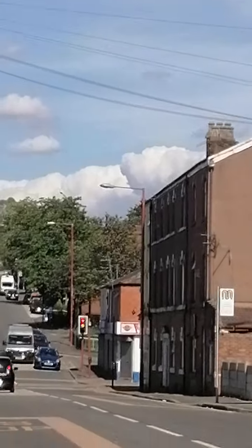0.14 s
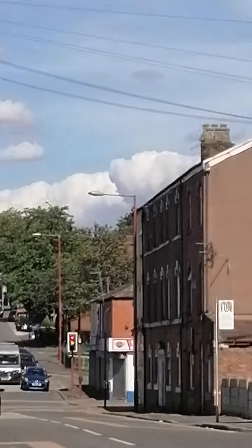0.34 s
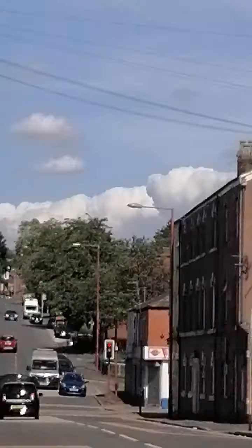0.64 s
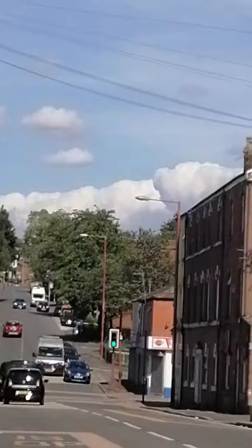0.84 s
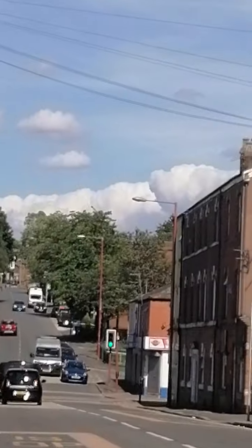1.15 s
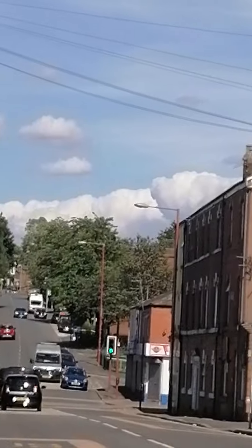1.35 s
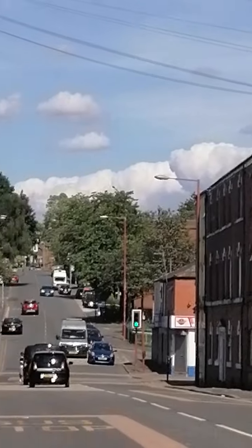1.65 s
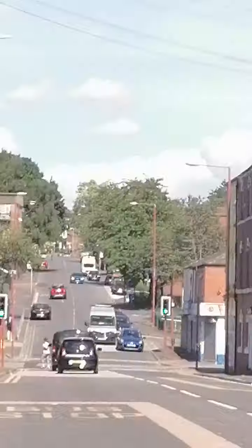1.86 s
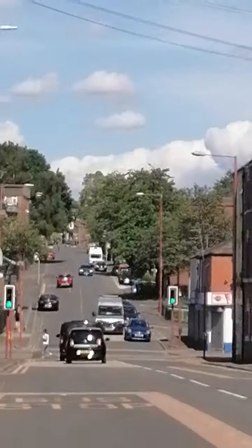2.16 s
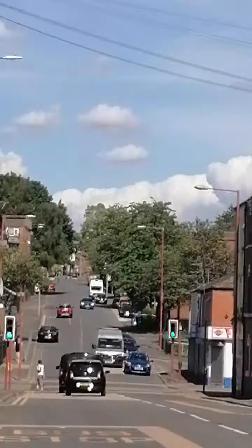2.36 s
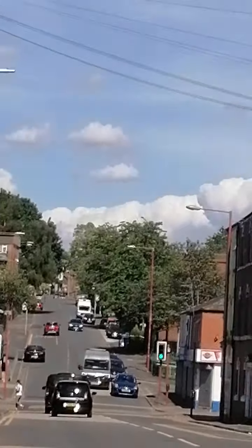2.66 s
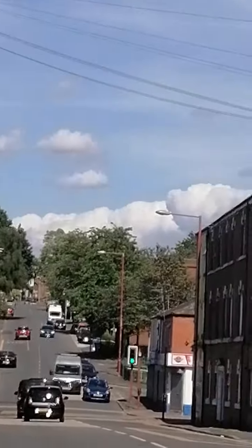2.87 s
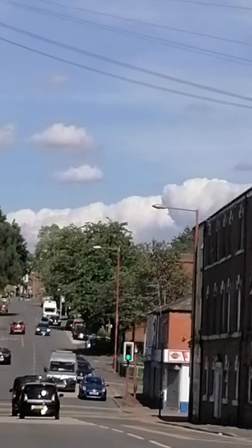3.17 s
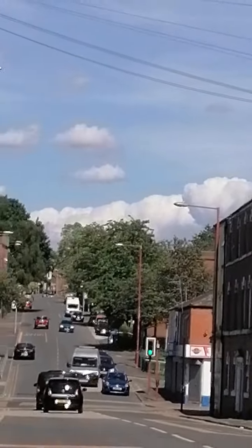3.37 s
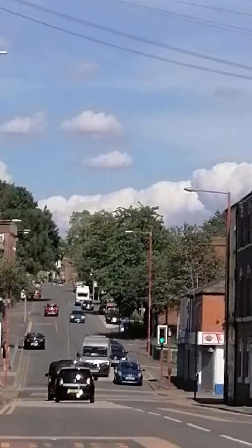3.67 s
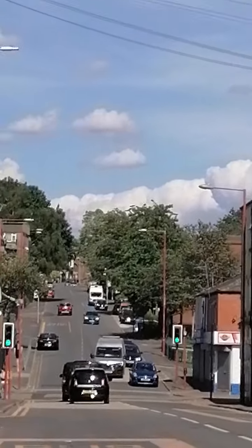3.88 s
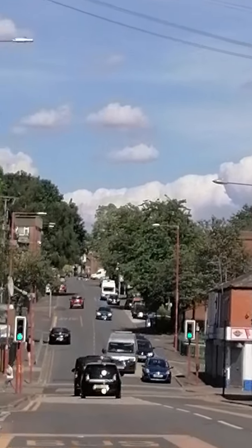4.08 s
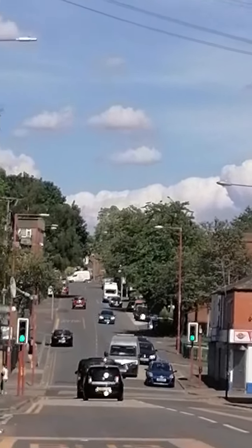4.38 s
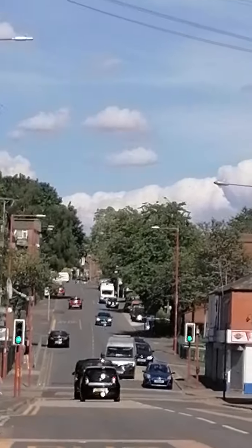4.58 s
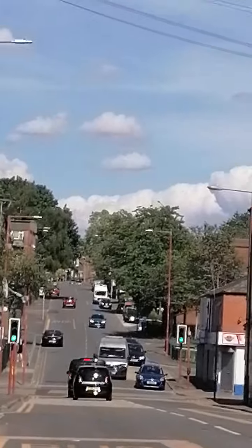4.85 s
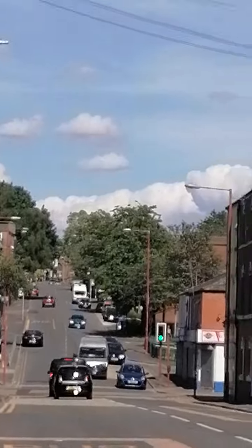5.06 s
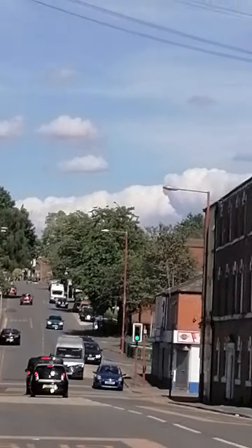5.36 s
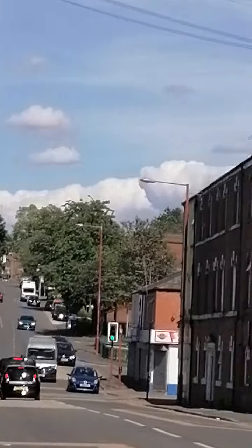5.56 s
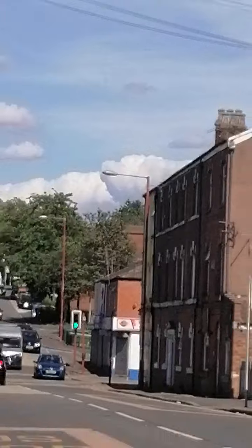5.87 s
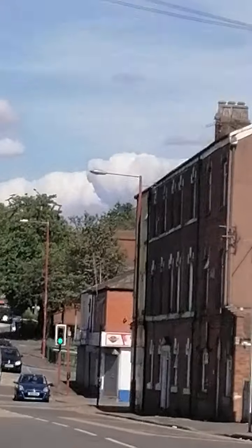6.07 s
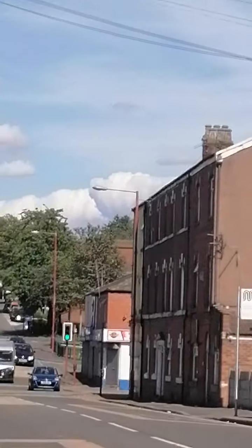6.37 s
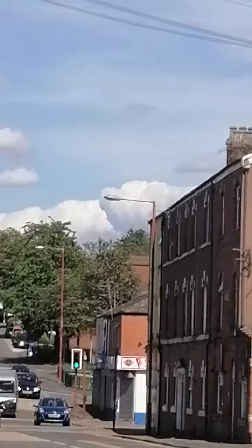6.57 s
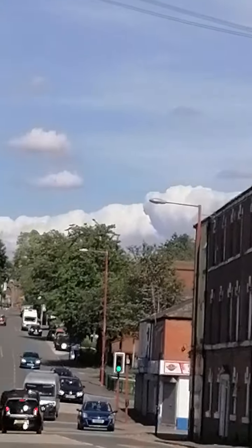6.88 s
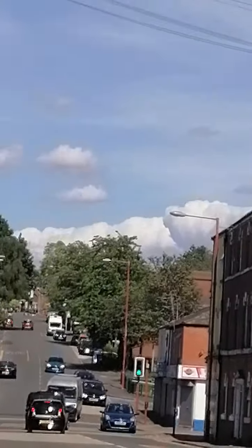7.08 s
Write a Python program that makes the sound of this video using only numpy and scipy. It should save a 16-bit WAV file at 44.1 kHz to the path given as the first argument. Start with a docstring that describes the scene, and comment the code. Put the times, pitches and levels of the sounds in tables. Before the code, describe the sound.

On-board ride on an electric scooter: low tyre roar and wavering motor hum, broken by bumps, small metallic rattles and soft traffic wash.

```python
"""Electric scooter on a town road, microphone on board

Tyre roar and traffic fill the deck and stem resonances: shaped noise, swelling over rough patches.
The hub motor hums in wavering tones, low noise rumbles as jolts shake the microphone, and bumps
knock the deck into dying modes. Loose metal fittings sizzle, tick and clack as rough contacts set
them ringing; twice something scuffs, as uneven noise through a gliding resonance."""
import sys
import numpy as np
from scipy import signal
from scipy.io import wavfile
from scipy.ndimage import uniform_filter1d

SR = 44100
rng = np.random.default_rng(int(sys.argv[2]) if len(sys.argv) > 2 else 0)


def generate_wav(sig):
    """Save sig (samples, or channels by samples) to the path in sys.argv[1] as 16-bit PCM at SR."""
    pcm = np.round(np.clip(np.atleast_2d(sig).T, -1, 1) * 32767).astype(np.int16)
    wavfile.write(sys.argv[1], SR, pcm)


N = 318843  # samples

# What the loose fittings ring with, before detuning and striking:
# (frequency [Hz], relative level [dB], time to die by 60 dB [s])
FITTING_MODES = [(1480, 2, 0.026), (2300, -1, 0.016), (2560, -5.5, .02), (2985, -4.5, 0.0051),
                 (3260, -4.5, 0.029), (3560, -4.5, 0.023), (4180, -6, .015), (4780, 1, 0.012),
                 (5220, 3, 0.022), (5490, -2, 0.018), (5730, 0.5, 0.015), (6220, 1, 0.028),
                 (6780, -5.5, .015), (6945, 3, 0.021)]
# Fittings' jitter on smooth road: (low parts level [dB], high parts level [dB])
SMOOTH_ROAD_DB = (-68, -76)


def gain_of(db):
    """Decibels to an amplitude factor."""
    return 10 ** (np.asarray(db) / 20)


def evened(x):
    """Scales to rms 1."""
    return x / np.sqrt(np.mean(x ** 2) + 1e-20)


def read(points, hz):
    """A spectrum table at the given frequencies, interpolated on a log scale."""
    f, value = np.transpose(points)
    return np.interp(np.log(hz + 1), np.log(f + 1), value)


def curve(rows, t, axis=1):
    """One column of a time table at the times t."""
    rows = np.array(rows)
    return np.interp(t, rows[:, 0], rows[:, axis])


def add(mix, s, sound):
    """Mixes a sound in at second s."""
    part = mix[round(s * SR):][:len(sound)]
    part += sound[:len(part)]


def noise(points, size, patchy_db, extra_db=lambda hz, t: 0):
    """Noise of rms 1 from random short-time spectra with drifting loud and quiet patches."""
    hop = size // 4
    frames = N // hop + 5
    hz = np.fft.rfftfreq(size, 1 / SR)[:, None]
    a, b, patches = rng.standard_normal((frames, len(hz), 3)).T
    patches = uniform_filter1d(patches, size=8, axis=0)
    patches = evened(uniform_filter1d(patches, size=8, axis=1))
    frame_s = np.arange(frames) * hop / SR
    db = read(points, hz) + patchy_db * patches + extra_db(hz, frame_s)
    spectra = (a + 1j * b) * gain_of(db)
    return evened(signal.istft(spectra, nperseg=size, noverlap=size - hop)[1][:N])


def ring(modes, db, phases, size):
    """Sum of dying sines, one for each mode; phases in turns."""
    hz, mode_db, t60 = np.transpose(modes)[:, :, None]
    t = np.arange(size) / SR
    level_db = mode_db + db[:, None] - 60 * t / t60
    return (gain_of(level_db) * np.sin(2 * np.pi * (hz * t + phases[:, None]))).sum(0)


def favour(hz, struck_hz, spread, boost_db):
    """Modes near the struck one, on a log scale, get the most of a blow: 0 dB there, less away."""
    return boost_db * (np.exp(-(np.log(hz / struck_hz) / spread) ** 2) - 1)


def humps(t, centre, half_s, db, base_db):
    """Level in dB of bell-shaped swells over a steady base, powers added."""
    power = gain_of(2 * db[:, None]) * np.exp(-((t - centre[:, None]) / half_s[:, None]) ** 2)
    return 10 * np.log10(gain_of(2 * base_db) + power.sum(0))


def shaking(t):
    """Jitter levels in dB of the low and of the high parts as the wheels cross the rough patches."""
    # Rough patches of road, each added to the smooth-road jitter:
    # (centre [s], half length [s], low parts level [dB], high parts level [dB])
    patches = [(.23, .05, -60.5, -66.5), (0.529, .1, -64.5, -72.5), (0.999, 0.079, -66.5, -73.5),
               (1.293, 0.1, -67, -75), (1.497, 0.042, -65, -73), (1.798, 0.081, -68, -68.5),
               (2.005, 0.071, -69, -75), (2.277, 0.063, -56, -61), (2.545, .05, -70, -70),
               (2.74, 0.08, -61.5, -68.5), (3.043, .06, -69, -77), (3.322, .07, -67.5, -69.5),
               (3.549, 0.053, -67, -72), (3.812, .08, -63, -68), (4.151, 0.042, -64, -71),
               (4.497, 0.037, -62.5, -67.5), (4.663, 0.029, -64, -67), (4.792, 0.064, -67.5, -64.5),
               (4.989, .07, -63, -68.5), (5.118, 0.051, -65.5, -68.5), (5.265, .06, -60, -70),
               (5.504, 0.03, -68, -68.5), (5.977, .06, -64.5, -70), (6.196, 0.03, -62.5, -67),
               (7.208, 0.074, -69, -73)]
    s, half_s, *levels = np.transpose(patches)
    coarse = t[::64]
    return [np.interp(t, coarse, humps(coarse, s, half_s, db, base))
            for db, base in zip(levels, SMOOTH_ROAD_DB)]


def rumble(t):
    """Low rumble, mostly under 60 Hz, that swells as jolts shake the microphone."""
    # Spectrum of the rumble: (frequency [Hz], relative level [dB])
    spectrum = [(12, -8.5), (22, 1.5), (30, -0.5), (40, -5), (70, -20.5), (200, -73)]
    # Swells as jolts shake the microphone, over a steady low rumble: (time of the peak [s], level [dB])
    swells = [(.2, -47.5), (.57, -44), (1.4, -55.5), (2.33, -39.5), (2.79, -45.5), (3.38, -40),
              (3.8, -42.5), (4.79, -41.5), (5.27, -38), (5.55, -38), (5.95, -43.5), (7.2, -41)]
    steady_db, swell_half_s = -51.5, 0.065
    s, db = np.transpose(swells)
    coarse = t[::64]
    level_db = np.interp(t, coarse, humps(coarse, s, swell_half_s + 0 * s, db, steady_db))
    return gain_of(level_db) * noise(spectrum, size=4096, patchy_db=-1.1)


def scuffs():
    """Uneven slips of something rubbing, heard through a gliding resonance."""
    # Brief rubs: (start [s], length [s], from [Hz], to [Hz], resonance width [Hz],
    # level before fading [dB], fading [dB per s])
    rubs = [(1.157, 0.27, 2860, 3360, 400, -69.5, 3), (6.933, 0.18, 2670, 2860, 1300, -56.5, 114)]
    out = np.zeros(N)
    t = np.arange(0, .3, 1 / SR)
    for s, length, from_hz, to_hz, width, db, fade_db in rubs:
        unevenness = evened(uniform_filter1d(rng.standard_normal(len(t)), size=200))
        slips = rng.standard_normal(len(t)) * gain_of(2.5 * unevenness)
        # a two-pole resonance at 0 Hz, then turned up to the gliding frequency
        r = np.exp(-np.pi * width / SR)
        scattered = slips * np.exp(2j * np.pi * rng.random(len(t)))
        smooth = signal.lfilter([1], np.poly([r, r]), scattered)
        glide_hz = np.interp(t, [0, length], [from_hz, to_hz])
        turn = np.exp(2j * np.pi * np.cumsum(glide_hz) / SR)
        ramps = np.clip(np.minimum(t / 0.01, (length - t) / 0.024), 0, 1)
        add(out, s, ramps * gain_of(db - fade_db * t) * evened((smooth * turn).real))
    return out


def motor(t):
    """Hub motor tones whose strength and phase wander within a narrow width."""
    # Wavering hums: (frequency [Hz], width [Hz], level [dB])
    hums = [(368.5, 2.7, -52), (147, 7.2, -53.5)]
    out = np.zeros(N)
    for hz, width, db in hums:
        r = np.exp(-np.pi * width / SR)
        drive = rng.standard_normal(N) + 1j * rng.standard_normal(N)
        wander = signal.lfilter([1], [1, -r], drive)
        swing = 0.49 + wander / np.std(wander)  # a steady part plus the wandering one
        out += gain_of(db) * evened((swing * np.exp(2j * np.pi * hz * t)).real)
    return out


def road(t):
    """Tyre roar, louder over rough patches; passing cars lift a broad band around 1 kHz."""
    # The ride: (time [s], tyre roar on smooth road [dB], lift of the traffic band [dB])
    ride = [(0.0, -39.5, -4), (0.3, -41.5, 2.5), (0.91, -42, 4), (1.53, -40, 0.5), (2.2, -41, 2),
            (2.78, -40, 0.5), (4.39, -41, 7), (4.63, -39.5, 1.5), (5.17, -41.5, 5.5), (6.1, -40, 2),
            (6.89, -41, 3), (7.23, -41, 3)]
    # Roar through deck and stem: (frequency [Hz], relative level [dB])
    spectrum = [(35, -30), (60, -13), (103, -13), (141, -3.5), (157, 2), (178, -13), (312, 0), (339, -4),
                (368, 3.5), (394, -11.5), (416, -6.5), (794, -11.5), (1070, -9.5), (1170, -15.5),
                (1600, -28.5), (2080, -62), (3520, -120)]
    roar_per_shake = 0.16  # dB of tyre roar gained for each dB of shaking

    def traffic_lift(hz, s):
        return curve(ride, s, axis=2) * np.exp(-(np.log((hz + 1) / 1020) / 0.41) ** 2)

    rough_db = roar_per_shake * (shaking(t)[0] - SMOOTH_ROAD_DB[0])
    roar = noise(spectrum, size=1024, patchy_db=1.23, extra_db=traffic_lift)
    return gain_of(curve(ride, t) + rough_db) * roar


def jitter(t):
    """Countless tiny contacts: a flickering sizzle plus sparse ticks into the fittings."""
    # Spectrum of the sizzle: (frequency [Hz], relative level [dB])
    sizzle = [(1000, -34), (1500, -1.5), (2000, -0.5), (2600, -4), (3400, -4), (4000, -11), (4800, -3),
              (5300, 3.5), (6200, -3.5), (7100, 4.5), (8200, -44.5)]
    ticks_per_s = 60.  # at each spot
    flicker = evened(uniform_filter1d(rng.standard_normal(N), size=300))
    contacts = gain_of(2.0 * flicker) * noise(sizzle, size=256, patchy_db=2.5)
    hz = np.array(FITTING_MODES)[:, 0]
    ticks = np.zeros(N)
    for k in range(8):  # eight spots, each with its own share of the modes
        share_db = 6.5 * rng.standard_normal(len(hz)) + favour(hz, 5300, 0.04, 5.7)
        spot = ring(FITTING_MODES, share_db, rng.random(len(hz)), size=1500)
        strength = gain_of(5.9 * np.minimum(rng.exponential(1, N), 3.5))
        train = strength * (rng.random(N) < ticks_per_s / SR)
        ticks += signal.oaconvolve(train, evened(spot))[:N]
    low_db, high_db = shaking(t)
    # harder shaking, more of the ticks against the sizzle
    contacts += gain_of(-6. + .6 * (high_db - SMOOTH_ROAD_DB[1])) * evened(ticks)
    lowpass = signal.butter(4, 4150, fs=SR, output="sos")  # parts low and high from each other
    low = signal.sosfiltfilt(lowpass, contacts)
    return gain_of(low_db) * evened(low) + gain_of(high_db) * evened(contacts - low)


def bumps():
    """A soft blow under the wheels rings the deck, most at the mode it lands on."""
    # Bumps: (start [s], peak level [dB], mode struck hardest [Hz])
    blows = [(0.155, -29, 325), (0.177, -32.5, 1000), (.231, -28, 1250), (.241, -26.5, 315),
             (.429, -32.5, 345), (0.46, -32.5, 270), (1.02, -32.5, 294), (1.735, -33.5, 330),
             (2.18, -29, 306), (2.244, -25, 520), (2.256, -29, 520), (2.263, -23.5, 1090),
             (2.271, -22, 350), (2.359, -33.5, 314), (2.711, -35.5, 1090), (2.715, -29, 314),
             (2.738, -21.5, 320), (2.795, -32, 310), (2.81, -32, 282), (3.811, -31, 320),
             (4.969, -28.5, 317), (5.136, -31.5, 1250), (5.191, -30, 490), (5.198, -32, 900),
             (5.233, -33, 500), (7.023, -38, 345)]
    # Deck modes, before striking: (frequency [Hz], relative level [dB], time to die by 60 dB [s])
    deck = [(270, 9, 0.14), (315, 8, 0.1), (345, -3, 0.13), (449, -10, 0.15), (520, -3, 0.037),
            (900, -7.5, 0.038), (1090, -3.5, 0.053), (1250, -6, 0.059)]
    out, hz = np.zeros(N), np.array(deck)[:, 0]
    t = np.arange(5000) / SR
    for s, db, struck_hz in blows:
        rung = ring(deck, favour(hz, struck_hz, .2, 24), 0 * hz, size=len(t))
        rung *= 1 - np.exp(-t * struck_hz / 0.81)  # blows on low modes swing up more slowly
        add(out, s, gain_of(db) * rung / abs(rung).max())
    return out


def clacks():
    """A short rough contact rings the fittings, spits a broad crack and leaves a chatter of rebounds."""
    # Clacks of the fittings: (time near the peak [s], ring level at its loudest [dB],
    # part struck hardest [Hz], low parts' boost [dB], thin rod's ring against the clack [dB])
    blows = [(0.2068, -34, 4800, -1, -11), (0.2246, -42, 4870, 5, -44), (0.2338, -39.5, 3680, 5, -4),
             (0.2512, -52.5, 2560, -3, -42), (0.264, -48, 3770, 2, -41), (0.496, -50, 5450, -7, -40),
             (0.5046, -46, 5280, 4, -40), (0.523, -50, 3750, 5, -5), (0.63, -55.5, 4800, 7, -40),
             (0.644, -55.5, 4820, 0, -24), (1.274, -52.5, 3530, -7, -28), (1.5084, -50, 3040, 8, -14),
             (1.7544, -55, 2580, -2, -4), (2.236, -47, 5360, -9, -40), (2.2451, -45, 5280, -10, -18),
             (2.2606, -38, 2110, 4.5, -41), (2.267, -40.5, 6930, -4, -29), (2.3025, -42.5, 5320, 1, -39),
             (2.308, -41, 3490, -3, -27), (2.3251, -55, 5300, 0, -40), (2.3357, -46, 2110, 7, -40),
             (2.343, -45.5, 3620, 7, -40), (2.3507, -38, 4930, -6.5, -12), (2.367, -51.5, 3680, 0, -31),
             (2.5274, -53.5, 5280, -2, -42), (2.6947, -52.5, 2000, 5, -18), (3.759, -52, 3700, 8, -5),
             (3.7753, -48.5, 5300, -7, -45), (3.7814, -50, 6870, -4, -38), (3.789, -52, 3700, -3, -40),
             (3.83, -48, 3360, -7, -22), (4.582, -52.5, 3470, -4, -11), (4.744, -50.5, 5490, -5, -21),
             (4.759, -51, 3660, -5, -15), (4.7736, -43.5, 3490, 2, -16), (4.79, -49, 2610, 7, -41),
             (4.81, -56, 3730, -1, -6), (4.8554, -55, 5280, -5, -2), (4.8707, -44, 5190, 5, -8),
             (4.887, -45.5, 3730, 2, -38), (4.936, -53, 3680, 7, -3), (4.9645, -40, 4180, 3, -14),
             (4.998, -35.5, 5230, -7, -8), (5.027, -49, 3700, 8, -21), (5.137, -50, 2280, 3, -9),
             (5.1961, -51.5, 2390, 9, -3), (5.2178, -40.5, 3490, 2, -29), (5.2423, -45.5, 4890, 0, -12),
             (5.2606, -43, 3490, 15, -19), (5.2723, -44.5, 4780, -1, -12), (5.2964, -46, 3510, 4, -8),
             (6.1846, -56.5, 5280, -10, -3), (6.8317, -47, 3400, -1, -8)]
    # Modes of one bracket, which ring together: (frequencies [Hz])
    bracket_hz = (2560, 3280, 3520, 4790)
    # One thin part that rings longer: (frequency [Hz], time to die by 60 dB [s])
    thin_rod = (3745, .09)
    contact_s, top_db = .0018, -3.5  # typical rise of a contact; top parts' boost unless struck
    out, hz = np.zeros(N), np.array(FITTING_MODES)[:, 0]
    t = np.arange(5000) / SR
    short = t[:2000]
    crack_band = signal.butter(3, [1700, 6600], "band", fs=SR, output="sos")
    bracket = np.min(abs(np.log(hz[:, None] / bracket_hz)), axis=1) < .05
    rod_hz, rod_t60 = thin_rod
    rod = np.sin(2 * np.pi * rod_hz * t) * gain_of(-60 * t / rod_t60) * (1 - np.exp(-t / 0.00075))
    for s, db, struck_hz, low_db, rod_db in blows:
        phase, share, detune = rng.random((3, len(hz)))
        grit = rng.standard_normal(len(short))

        unstruck_top = (hz > 5750) & (struck_hz < 5750)
        colour = np.where(hz < 3100, low_db, np.where(unstruck_top, top_db, 0))
        colour = colour + 5 * (share - .5)  # each blow lands a little differently
        colour += favour(hz, struck_hz, .05, 4.)
        # the bracket rings as one when struck; otherwise the other parts gain
        colour += 9 * (bracket == bracket[np.argmin(abs(hz - struck_hz))])

        rise = contact_s * gain_of(4.2 * (rng.random() - .5))  # some contacts are softer
        u = short / rise
        rebound_at = (rng.random(len(short)) < 1500. / SR) & (u > 1)  # 1500 per s on average
        rebounds = gain_of(2.0 - 60 * short / 0.077) * rebound_at
        contact = grit * ((u * np.exp(1 - u)) ** 1.2 + rebounds)

        modes = np.array(FITTING_MODES)
        modes[:, 0] *= 1 + 0.039 * (detune - .5)  # loose parts never sit the same way twice
        rung = signal.fftconvolve(contact, ring(modes, colour, phase, size=1500))
        rung /= np.sqrt(uniform_filter1d(rung ** 2, size=90).max())  # loudest 2 ms at rms 1
        rung[:len(short)] += gain_of(-7.0) * signal.sosfilt(crack_band, contact)
        add(out, s - rise - .0008, gain_of(db) * rung)
        add(out, s - rise, gain_of(db + rod_db) * rod)
    return out


def scene():
    """All sources at the one microphone on board."""
    t = np.arange(N) / SR
    return (rumble(t) + scuffs() + motor(t) + road(t) + jitter(t) + bumps() + clacks())[None]


def record(dry):
    """Dull treble ending near 8 kHz, over very faint hiss up to 15.7 kHz."""
    treble_end_hz, hiss_end_hz, hiss_db = 7950, 15700, -99  # hiss level before its upper end is cut
    soft = signal.sosfilt(signal.butter(12, 7350, fs=SR, output="sos"), dry)
    treble_end = signal.firwin(511, treble_end_hz, window=("kaiser", 9), fs=SR)[None]
    narrow = signal.oaconvolve(soft, treble_end, "same")
    hissing = narrow + gain_of(hiss_db) * rng.standard_normal(dry.shape)
    hiss_end = signal.firwin(511, hiss_end_hz, window=("kaiser", 9), fs=SR)[None]
    return signal.oaconvolve(hissing, hiss_end, "same")


dry = scene()
out = record(dry)
generate_wav(out)
```